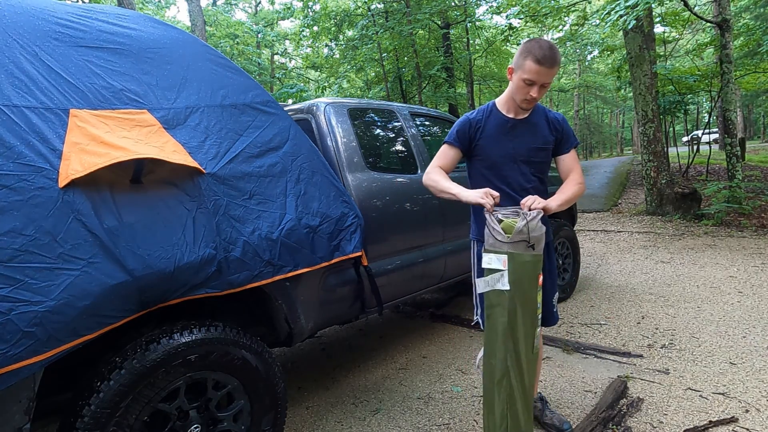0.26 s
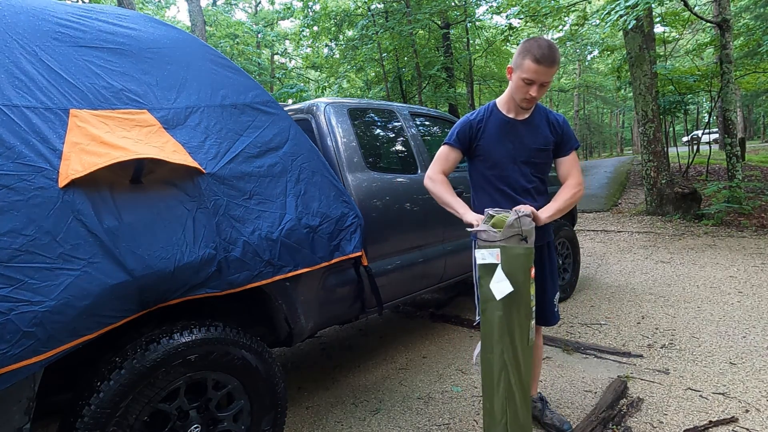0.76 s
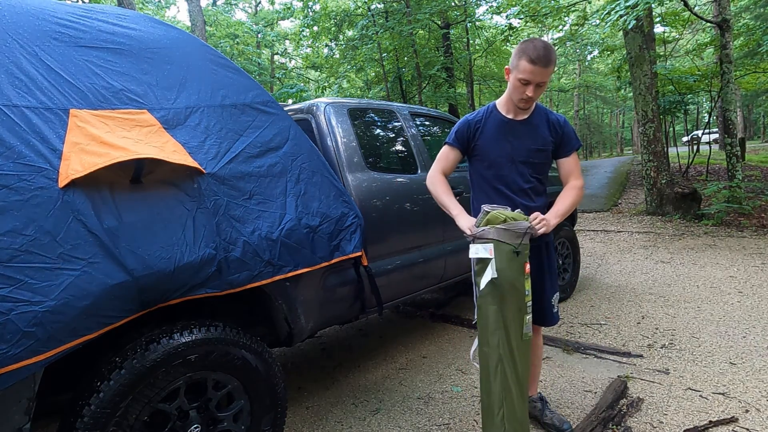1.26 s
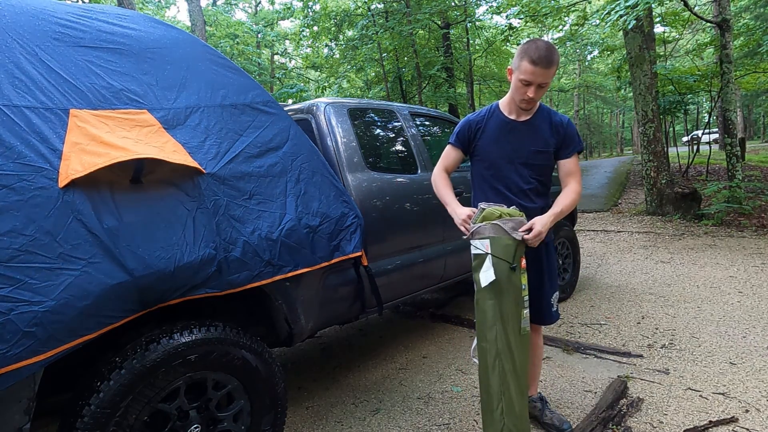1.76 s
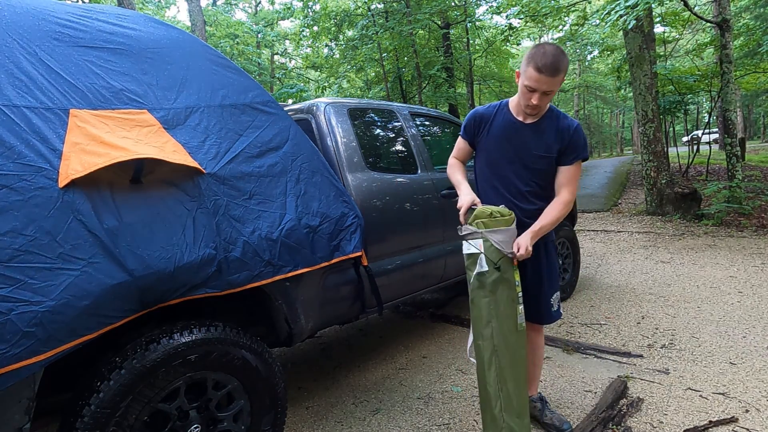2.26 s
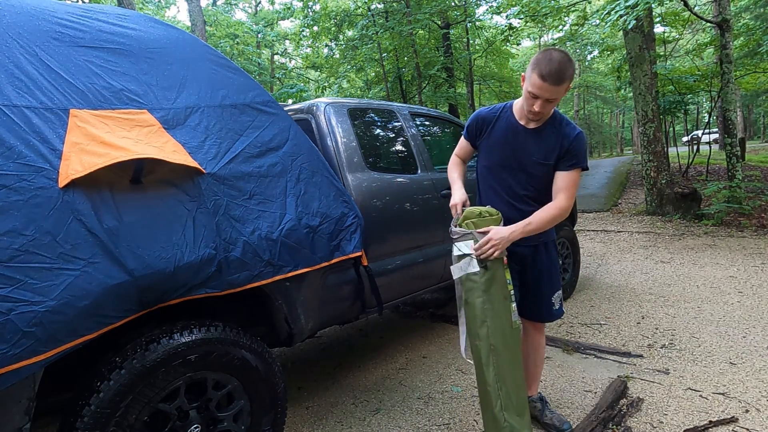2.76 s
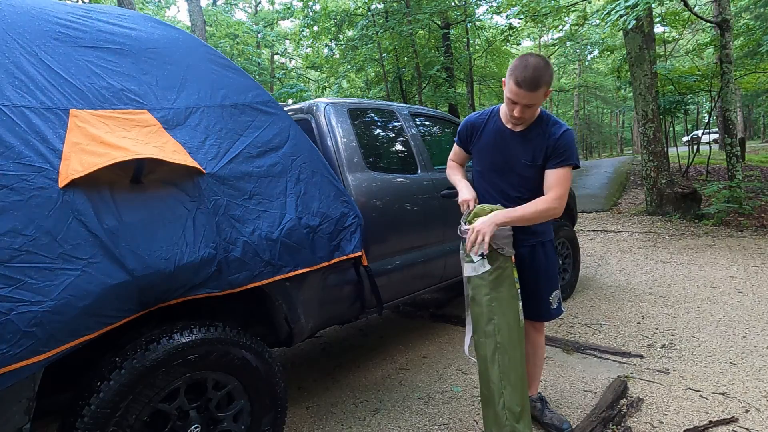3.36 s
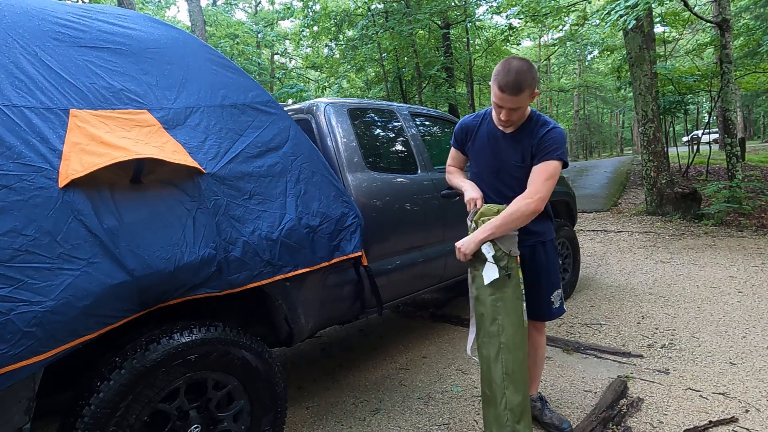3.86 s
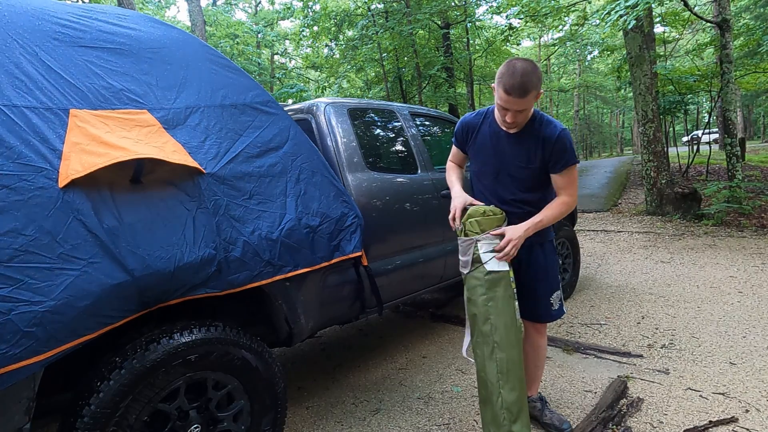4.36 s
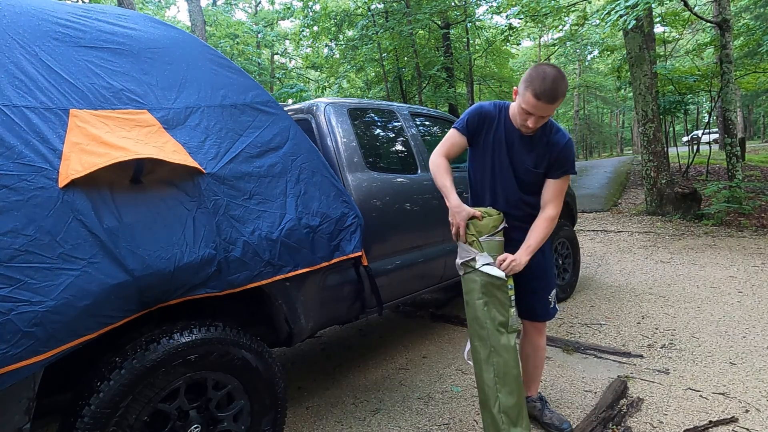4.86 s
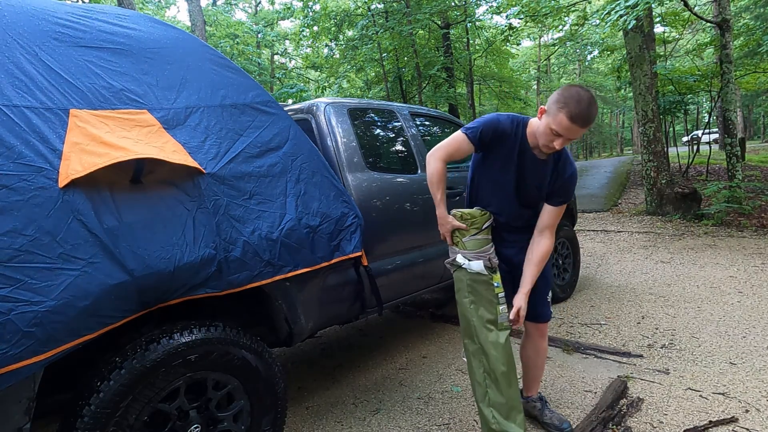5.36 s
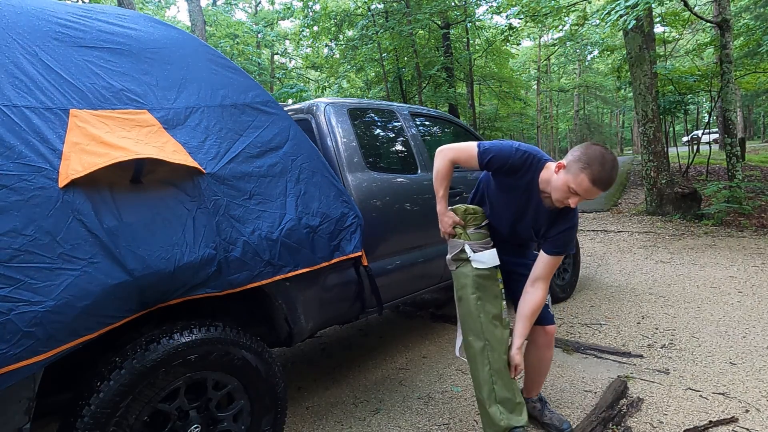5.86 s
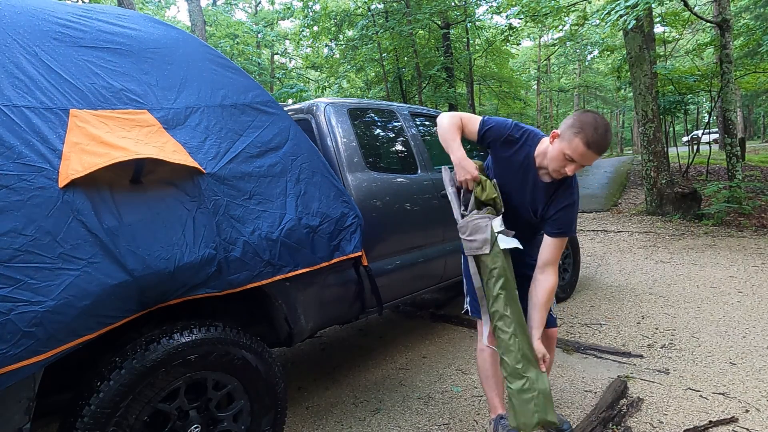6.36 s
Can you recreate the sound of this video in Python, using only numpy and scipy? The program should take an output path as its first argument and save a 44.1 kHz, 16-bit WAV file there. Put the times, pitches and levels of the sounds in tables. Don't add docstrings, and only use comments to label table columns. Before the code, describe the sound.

Outdoors in a wood, quiet leaf hiss, far rumble and a deep, slightly wavering generator hum run throughout. Close by and slightly right, hands work stiff nylon: faint swishes and small crinkles from 0 s, a sharper fold snap with a dull bump at 0.87, a rustle near 1.25, then sparse light crumples. A barely audible high chirp sounds far off around 1.95. Firmer rubbing and popping creases come at 2.4-2.7 and 3.0-3.4, with a short airy flick at 3.0, then a lull until about 4.0. Pulling begins: longer hisses, and a cluster of hollow knocks at 4.75-5.0. A small buckle clinks at 5.2; a metal pole end rings brightly at 5.3 with tiny bounces, half damped by cloth. A crisp snap follows at 5.6, then bumps and crackles from 5.9, building to the loudest, densest rustle and snaps at 6.4-6.6.

```python
import sys
import numpy as np
from scipy import signal
from scipy.fft import rfft, irfft
from scipy.io import wavfile

SR = 44100
rng = np.random.default_rng(int(sys.argv[2]) if len(sys.argv) > 2 else 0)


def log_audio(samples):
    frames = np.atleast_2d(samples).T
    limited = np.clip(frames, -1, 1)
    pcm = np.round(limited * 32767).astype(np.int16)
    wavfile.write(sys.argv[1], SR, pcm)


def field_ratio(decibels):
    return 10 ** (np.asarray(decibels, dtype=float) / 20)


N = 291226


def rms_one(x):
    return x / np.sqrt(np.mean(x ** 2) + 1e-20)


def peak_one(x):
    return x / np.max(np.abs(x))


def in_time(rows):
    s, *columns = np.transpose(rows)
    return [np.interp(np.arange(N) / SR, s, c) for c in columns]


def at_hz(points, hz):
    point_hz, values = np.transpose(points)
    return np.interp(np.log(hz), np.log(point_hz), values)


def coloured(x, spectrum):
    hz = np.arange(N // 2 + 1) * SR / N + 1
    return irfft(rfft(x) * field_ratio(at_hz(spectrum, hz)), N)


def filtered(x, order, hz, kind):
    return signal.sosfilt(signal.butter(order, hz, kind, fs=SR, output="sos"), x)


def drift(rate_hz):
    r = np.exp(-80 * np.pi * rate_hz / SR)
    noise = rng.standard_normal(N // 40 + 2002)
    slow = signal.lfilter([1], [1, -2 * r, r * r], noise)[2000:]
    return np.interp(np.arange(N) / 40, np.arange(len(slow)), rms_one(slow))


def ring(clicks, hz, t60):
    r, w = field_ratio(-60 / (t60 * SR)), 2 * np.pi * hz / SR
    return signal.lfilter([0, np.sin(w)], [1, -2 * r * np.cos(w), r * r], clicks + 1e-18)


def grains(per_s, spread_db, clump_db):
    sizes = field_ratio(spread_db * np.minimum(rng.exponential(1, N), 4)) * rng.standard_normal(N)
    return sizes * (rng.random(N) < per_s * field_ratio(clump_db * drift(25)) / SR)


def ringing_grains(clicks, low_hz, high_hz, cycles):
    pitches = np.geomspace(low_hz, high_hz, num=12)
    dealt = rng.integers(0, 12, size=N)
    return rms_one(sum(ring(clicks * (dealt == k), hz, cycles / hz) for k, hz in enumerate(pitches)))


def add(out, s, sound):
    i = round(s * SR)
    out[i:i + len(sound)] += sound[:N - i]


# time in seconds, pitch in Hz, level in dB.
HUM = [(0.0, 46.7, -40), (0.4, 47.2, -37.5), (0.5, 46, -42), (0.73, 45.9, -37.5), (2.65, 45.9, -39),
       (2.74, 46.5, -37.5), (3.09, 46.8, -40.5), (3.53, 46.6, -36.5), (3.86, 46.4, -40),
       (4.34, 46.77, -37.5), (4.8, 46.53, -39.5), (4.98, 46.6, -37), (6.6, 46.4, -42)]


def generator():
    hz, level_db = in_time(HUM)
    phase = 2 * np.pi * np.cumsum(hz) / SR + np.array([[-.035], [.035]])
    return np.sqrt(2) * field_ratio(level_db + 0.82 * drift(6.9)) * np.sin(phase)


# frequency in Hz, density in dB per Hz.
WOOD_SPECTRUM = [(20, -6.5), (40, -10), (60, 2), (100, -2), (128, -1), (150, -10), (270, -23), (430, -27),
                 (810, -53), (1030, -24.5), (5550, -34.5), (8200, -40), (12700, -55), (14200, -78)]
# frequency in Hz, likeness from 0 to 1.
WOOD_LIKENESS = [(40, 1), (150, 0.88), (400, 0.24), (800, .3), (1200, 0.21), (5000, 0.26), (6100, 0.4),
                 (6600, 0.96), (12500, 0.92), (13500, 0.4)]


def wood():
    mid, side = rng.standard_normal((2, N))
    unlike = [(hz, 10 * np.log10(1 - np.clip(c, 0, .999))) for hz, c in WOOD_LIKENESS]
    mid = coloured(mid, WOOD_SPECTRUM)
    side = coloured(coloured(side, WOOD_SPECTRUM), unlike) / np.sqrt(2)
    level = field_ratio(-51.5 + 0.49 * drift(2.6))
    return level * (mid + side * [[1], [-1]]) / np.std(mid)


# middle in seconds, spread in seconds, level in dB, pitch in Hz, width in Hz,
# left over right in dB.
CHIRP = (1.96, .045, -69, 7800, 500, -4)


def chirp():
    s, spread_s, db, hz, width_hz, pan_db = CHIRP
    breath = filtered(rng.standard_normal((2, N)), 2, [hz - width_hz / 2, hz + width_hz / 2], "band")
    swell = np.exp(-.5 * ((np.arange(N) / SR - s) / spread_s) ** 2)
    return field_ratio(db + pan_db * np.array([[.5], [-.5]])) * swell * rms_one(breath)


# start in seconds, level in dB.
POLE_HITS = [
    (5.301, -31),
    (5.30726, -38.5),
    (5.329, -40),
    (5.342, -57),
]
# pitch in Hz, level in dB, t60 in seconds.
POLE_MODES = [(6711.5, -3.5, 0.76), (6715, -7, 0.23), (6800, -8, 0.45), (6800, -7, 0.15), (6857, -10, 0.13),
              (6050, -23, .03), (7000, -18, .09), (7500, -13, 0.089), (4370, -7, 0.04), (5250, -16, 0.054),
              (3250, -19, .03), (9050, -20, .04), (10100, -20, .04)]
# start in seconds, level in dB, pitch in Hz, t60 in seconds.
CLINK = (5.212, -42, 2643, 0.09)


def metal():
    hits, tap = np.zeros(N), np.zeros(N)
    for s, db in POLE_HITS:
        hits[round(s * SR)] = field_ratio(db)
    s, db, clink_hz, clink_t60 = CLINK
    tap[round(s * SR)] = field_ratio(db)
    grip_s, settle_s, grip_db = 5.347, 0.0073, -4
    held = field_ratio(grip_db * np.clip((np.arange(N) / SR - grip_s) / settle_s, 0, 1))
    pole = sum(field_ratio(d) * ring(hits, hz, t60) for hz, d, t60 in POLE_MODES)
    return held * pole + ring(tap, clink_hz, clink_t60)


# start in seconds, peak in dB.
FLICKS = [(0.8001, -54), (0.8739, -53), (1.0146, -55), (1.6477, -52), (1.8437, -52), (1.9081, -59),
          (2.0732, -54), (2.1525, -58), (2.6424, -51), (2.7422, -46), (2.9088, -50), (2.9782, -50.5),
          (3.025, -34), (3.2036, -48), (3.681, -48), (3.9859, -53), (4.2812, -55), (4.8074, -46),
          (5.1347, -43), (5.3014, -42), (5.5722, -56), (5.6095, -44), (5.8037, -58.5), (5.888, -42)]


def flicks():
    out, t = np.zeros(N), np.arange(800) / SR
    for s, db in FLICKS:
        puff = rng.standard_normal(len(t)) * t * np.exp(-t / 0.0028)
        add(out, s, field_ratio(db - 3.0) * peak_one(filtered(puff, 2, [6000, 14000], "band")))
    return out


# start in seconds, peak in dB, pitch in Hz.
KNOCKS = [(0.831, -52, 312), (0.874, -37, 450), (1.46, -46.5, 236), (1.72, -48, 234), (2.071, -41, 533),
          (2.164, -52, 367), (2.616, -57, 237), (2.648, -53, 420), (3.026, -51, 382), (3.047, -39, 765),
          (3.353, -54.5, 377), (3.988, -47, 703), (4.017, -39, 420), (4.225, -45, 380), (4.756, -27.5, 410),
          (4.744, -38.5, 362), (4.812, -38, 388), (4.845, -37, 428), (4.870, -40, 302), (4.882, -30.5, 465),
          (4.913, -38, 431), (4.926, -35, 400), (4.965, -32.5, 463), (4.99, -39, 450), (5.012, -46, 450),
          (2.503, -37, 400), (4.043, -41, 400), (4.053, -41, 420), (4.103, -43, 380), (1.07, -46, 250),
          (1.11, -47.5, 260), (4.13, -47.5, 200), (4.47, -47, 230), (3.39, -49, 250), (6.58, -36, 517),
          (5.177, -35.5, 429), (5.258, -34, 430.5), (5.307, -40, 407.5), (5.371, -36, 436),
          (5.544, -45.5, 349.5), (5.574, -32.5, 487), (5.609, -30.5, 430), (5.804, -37.5, 441),
          (5.964, -38.5, 413), (6.03, -41, 483), (6.214, -34, 670), (6.384, -31, 444), (6.472, -31, 368)]
# start in seconds, peak in dB, pitch in Hz.
THUMPS = [
    (0.87, -39, 110),
    (1.079, -50, 113),
    (4.119, -50, 110),
    (5.919, -48, 129),
    (5.999, -48, 143),
    (6.108, -45, 120.8),
    (6.166, -44, 206.5),
    (6.229, -38.5, 132),
]


def knocks():
    out, t = np.zeros(N), np.arange(3000) / SR
    for s, db, hz in KNOCKS + THUMPS:
        push = np.sin(2 * np.pi * hz * t) * t * np.exp(-t * hz / 1.24)
        add(out, s, field_ratio(db - 4.0) * peak_one(push))
    return out


# start in seconds, peak in dB, pitch in Hz.
CRINKLES = [(0.652, -48, 3070), (0.7248, -51, 6500), (0.7812, -46, 2900), (0.29, -48, 1200),
            (0.3, -51, 620), (1.225, -41, 1050), (2.168, -45, 650), (3.7, -50, 1800), (0.871, -39, 4480),
            (0.876, -39, 6600), (0.884, -43, 795), (0.914, -45, 2250), (0.928, -46, 3300),
            (0.9513, -46, 3680), (0.9633, -46, 2300), (1.0196, -43, 2650), (1.08, -35.5, 2150),
            (1.097, -43, 2100), (2.401, -31.5, 1450), (2.412, -41, 1200), (2.4, -40, 4710),
            (2.454, -36, 1900), (2.467, -35, 2600), (2.511, -42, 1200), (3.976, -46, 1060),
            (3.988, -40.5, 1603), (4.01, -39, 1043), (4.034, -38, 1100), (4.042, -37, 1400),
            (4.051, -36, 1000), (4.062, -40, 1900), (4.951, -37, 1150), (4.966, -33, 1090),
            (5.589, -32, 3500), (5.59, -38, 1800), (5.599, -37, 3800), (5.612, -31.5, 3120),
            (5.614, -28, 1800), (5.626, -35, 1800), (5.635, -38, 2300), (6.324, -38, 1050),
            (6.378, -32, 711), (6.428, -33, 801), (6.468, -32, 1150), (6.489, -29, 1000),
            (6.507, -29, 1000), (6.518, -34, 1250), (6.533, -32.5, 1150), (6.547, -30.5, 786),
            (6.558, -27, 2120), (6.564, -27, 1400), (6.565, -27, 4000), (6.571, -32, 1350),
            (6.584, -35, 1300), (6.588, -27, 4280),
            (2.823, -47, 1300), (2.947, -45, 2700), (3.027, -40, 1000), (3.037, -38, 1000), (3.055, -39.5, 900),
        (3.17, -46, 1000), (3.245, -40, 2197), (3.29, -42, 1400), (3.366, -41, 2050), (5.849, -42, 600),
        (5.91, -38.5, 900), (5.975, -37.5, 1150), (5.985, -39, 1000), (6.047, -35, 1100),
        (6.052, -36, 1800), (6.062, -35, 1000), (6.085, -39, 1000), (6.148, -40, 1600), (6.19, -33.5, 850),
        (6.233, -37.5, 650)]


def crinkles():
    out, t = np.zeros(N), np.arange(1500) / SR
    rise_s, cycles = 0.00033, 12
    for s, db, hz in CRINKLES:
        shape = (1 - np.exp(-t / rise_s)) * field_ratio(-60 * t * hz / cycles)
        add(out, s, field_ratio(db) * peak_one(shape * np.sin(2 * np.pi * hz * t)))
    return out


# start in seconds, peak in dB, pitch in Hz,
# broad crack in dB over the peak.
FOLD_SNAPS = [(0.029, -49, 1150, -9), (0.376, -45, 1080, -9), (0.552, -39, 1140, -14),
              (0.833, -33.5, 1610, -9), (0.873, -25, 1150, -21), (0.876, -25, 1650, -15),
              (1.137, -37, 1185, -7), (1.255, -30.5, 800, -9), (1.418, -44.5, 902, -9),
              (1.713, -43, 1005, -9), (1.906, -42, 1310, -9), (2.068, -39.5, 900, 4),
              (2.246, -36, 1406, -6), (2.396, -35, 1200, -9), (2.489, -41, 953, -9),
              (2.568, -39.5, 1890, -9), (2.65, -33, 1010, -9), (2.82, -46, 2990, -5),
              (2.904, -44, 1250, -2), (2.991, -38.5, 1058, -9), (3.045, -36, 1040, -9),
              (3.256, -35, 1350, -9), (3.351, -42, 1100, -6), (3.62, -49, 800, -9)]
# start in seconds, peak in dB, pitch in Hz, broad crack in dB over the peak.
PULL_SNAPS = [(4.29, -44, 1190, -12), (4.325, -37.5, 1540, -9), (4.753, -33.5, 2770, 2.5),
              (4.807, -35.5, 1346, -8.5), (4.873, -25, 1062, -9), (5.144, -30.5, 1090, -3),
              (5.178, -34, 1189, -9), (5.265, -37, 1697, -9), (5.286, -37, 1920, -9), (5.3, -28, 1310, -6),
              (5.372, -38, 941, -9), (5.403, -32.5, 1350, -7), (5.545, -39.5, 1200, -15),
              (5.574, -25, 3300, -6), (5.5746, -27.5, 1800, 6), (5.610, -26, 1820, -8),
              (5.804, -31, 1820, -0.5), (5.899, -31, 1873, -3), (5.965, -28.5, 1030, 2),
              (6.013, -33.5, 1727, -4), (6.032, -28, 1030, 2), (6.063, -30, 2700, -5.5),
              (6.169, -33.5, 2000, -9), (6.184, -28.5, 972, -9.5), (6.309, -32.5, 1034, -12),
              (6.385, -30, 718, -9), (6.405, -25, 1150, -10.5), (6.476, -27.5, 1073, -4),
              (6.557, -19, 1190, -3), (6.582, -25, 650, -3)]
# pitch in Hz, level in dB, t60 in seconds.
SACK_MODES = [(267, -37, 0.026), (420, 3.5, 0.05), (696, 6, 0.088)]


def snaps():
    out, t = np.zeros(N), np.arange(2000) / SR
    rows = FOLD_SNAPS + PULL_SNAPS
    burst_ms, crack_s = 9.6, 0.0026
    noises = rng.standard_normal((len(rows), len(t)))
    ticks_hz = 2700 * (5000 / 2700) ** rng.random(len(rows))
    for (s, db, hz, crack_db), tick_hz, noise in zip(rows, ticks_hz, noises):
        burst = noise * np.exp(-t * 2300 / burst_ms)
        burst[:4] -= 2.5
        burst = filtered(burst, 2, 5900, "low")
        fold = peak_one(ring(burst, hz, 13.0 / hz) + 0.28 * ring(burst, hz * 1.52, 8.6 / hz))
        knock = peak_one(sum(field_ratio(d) * ring(burst, f, t60) for f, d, t60 in SACK_MODES))
        tick = peak_one(ring(burst, tick_hz, 20.0 / tick_hz))
        crack = peak_one(filtered(burst * np.exp(-t / crack_s), 2, [600, 3200], "band"))
        add(out, s, field_ratio(db - 1.5) * (fold + field_ratio(-22.0) * knock + field_ratio(-31) * tick))
        add(out, s, field_ratio(db + crack_db) * crack)
    return out


def strokes(rows, rest_db, second_rest_db):
    t = np.arange(0, N + 64, 64) / SR
    power = [[field_ratio(rest_db) ** 2], [field_ratio(second_rest_db) ** 2]]
    for s, db, rise_s, fall_s, second_db in rows:
        away = np.where(t < s, (s - t) / max(rise_s, .005), (t - s) / max(fall_s, .005))
        power = power + field_ratio(db - 10 * away ** 1.16 + np.array([[0], [second_db]])) ** 2
    return [np.interp(np.arange(N) / SR, t, np.sqrt(p)) for p in power]


# peak in seconds, peak in dB,
# rise in seconds per 10 dB, fall in seconds per 10 dB, sheen in dB over swish.
FOLD_SLIDES = [(0.0, -52, 0.168, 0.05, -14.1), (0.382, -60.5, 0.24, -0.1, -9),
               (0.48, -62.5, 0.02, 0.203, -13), (0.875, -55, 0.11, 0.12, -7.5),
               (1.025, -51.5, 0.03, 0.04, -12), (1.09, -54, 0.08, 0.15, -9.5),
               (1.275, -48.5, 0.14, 0.04, -9.3), (1.493, -60.5, 0.3, 0, -11.3),
               (1.653, -54.0, 0.04, 0.03, -12), (1.718, -54.3, 0.03, 0.082, -11.3),
               (1.849, -57, -0.03, 0.062, -6.7), (1.977, -57.5, 0.05, -0.06, -11.9),
               (2.087, -53, 0.07, 0.093, -14.5), (2.428, -45.5, 0.116, 0.084, -9.5),
               (2.51, -50, 0.05, 0.02, -4), (2.665, -50.5, 0.09, 0.082, -9),
               (2.826, -57, 0.015, 0.01, -21.5), (2.915, -56.5, -0.05, 0.03, -5),
               (3.042, -50.5, 0.1, 0.08, -6.5), (3.284, -47, 0.16, 0.032, -11.6),
               (3.366, -52.5, 0.1, 0.053, -9.9), (3.685, -57, 0.15, 0.1, -7),
               (4.031, -49, 0.075, 0.09, -10.5)]
# peak in seconds, peak in dB,
# rise in seconds per 10 dB, fall in seconds per 10 dB, sheen in dB over swish.
PULL_SLIDES = [(4.338, -49, 0.16, -0.03, -8.5), (4.502, -53, 0.215, 0.021, -5),
               (4.597, -46.5, 0.12, 0.055, -9.5), (4.691, -51.5, 0.054, 0.06, -16.7),
               (4.752, -56, 0.04, 0.2, -12.5), (4.93, -42.0, 0.17, 0.09, -10.5),
               (5.148, -46.5, 0.03, 0.1, -8.5), (5.304, -48.5, -0.0147, 0.0546, 3.5),
               (5.39, -52.5, -0.07, 0.22, -13), (5.59, -48.5, 0.03, 0.16, -10.5),
               (5.9, -48.5, 0.22, 0.12, -9.5), (6.178, -49.5, 0.06, -0.1, -6),
               (6.407, -49.5, 0.129, 0.697, -7.2), (6.6, -39.5, 0.38, 0.439, -12)]
# peak in seconds, peak in dB,
# rise in seconds per 10 dB, fall in seconds per 10 dB, hollow in dB over crumple.
FOLD_GRIPS = [(0.0, -50, 0.072, 0.06, -1.5), (0.387, -55.0, 0.07, 0.027, -3),
              (0.563, -57.5, -0.02, 0.06, -4), (0.883, -47.0, 0.05, 0.03, 2.5),
              (1.086, -50.5, 0.09, 0.25, -0.5), (1.284, -46.1, 0.13, 0.01, 3),
              (1.473, -66, 0.041, 0.16, 10.0), (1.728, -52, 0.03, 0.1, -3), (1.915, -57.5, 0.03, 0.16, 2.4),
              (2.068, -52.5, -0.02, 0.026, 3), (2.162, -53.5, -0.02, 0.03, 4.5),
              (2.455, -46, 0.18, 0.12, -1.5), (2.653, -49.5, 0.04, 0.065, -0.6),
              (2.82, -54, -0.07, -0.04, -18.0), (3.047, -50, 0.06, 0.06, 0),
              (3.243, -46.5, 0.04, 0.062, -4), (3.358, -47, 0, 0.029, -2.3), (3.519, -64, -0.1, 0.013, 2.9),
              (3.67, -52, 0, 0, -15.9), (3.784, -62.3, -0.04, -0.05, 2.6), (4.044, -43, 0.07, 0.08, 1)]
# peak in seconds, peak in dB,
# rise in seconds per 10 dB, fall in seconds per 10 dB, hollow in dB over crumple.
PULL_GRIPS = [(4.226, -52.5, 0.04, 0.14, 4), (4.549, -51.5, 0.32, -0.3, -2),
              (4.768, -54.0, 0.04, -0.2, 10.0), (4.891, -44, 0.045, 0.14, 6.1),
              (5.183, -49, 0.15, 0.029, -4), (5.316, -48, 0.12, 0.05, -1), (5.39, -49, 0.025, 0.1, -2),
              (5.614, -43, 0.06, 0.08, -0.3), (5.909, -45, 0.216, 0.02, -1.5),
              (5.974, -46, -0.02, 0.1, 2.4), (6.05, -41.5, 0.06, 0.033, -4), (6.187, -44, 0.084, 0.2, 0),
              (6.405, -43.5, 0.13, 0.1, -5), (6.573, -37, 0.2, 2, -4.1)]
# frequency in Hz, density in dB per Hz.
SWISH = [(1800, -4.5), (2800, -3.5), (4800, -2.5), (6200, -7.5), (7500, -10), (9000, -30.5)]
# frequency in Hz, density in dB per Hz.
SHEEN = [(5500, -6), (7500, -5.5), (9000, -5), (12500, -7.5), (13800, -24), (15200, -50)]


def cloth():
    swish_gain, sheen_gain = strokes(FOLD_SLIDES + PULL_SLIDES, -66.5, -78.5)
    crumple_gain, hollow_gain = strokes(FOLD_GRIPS + PULL_GRIPS, -75.5, -78)
    weave = rng.standard_normal(N) * field_ratio(2.03 * drift(31))
    weave = weave + 0.73 * rms_one(grains(2500, 2.1, 3.8))
    swish = rms_one(coloured(weave, SWISH))
    sheen = rms_one(coloured(weave, SHEEN))
    crumple = ringing_grains(grains(5000, 2.2, 3.0), 937, 2450, cycles=12.3)
    crumple = filtered(crumple, 2, 740, "high")
    shakes = grains(2500, 3.0, 3.0)
    hollow = ringing_grains(shakes, 285, 690, cycles=3.8) + .5 * rms_one(ring(shakes, 432, 0.04))
    hollow = filtered(hollow, 2, 230, "high")
    slide = field_ratio(-1.3) * swish_gain * swish + field_ratio(-0.57) * sheen_gain * sheen
    return slide + field_ratio(-1.86) * crumple_gain * crumple + field_ratio(-6.5) * hollow_gain * hollow


def outdoors(x):
    t = np.arange(6000) / SR
    scatter_db, scatter_t60_s = -15.5, 0.17
    pan_share, port_lag = 0.11, 0.73
    scatter = rng.standard_normal((2, len(t))) * field_ratio(-60 * t / scatter_t60_s) * (t > .002)
    scatter *= field_ratio(scatter_db) / np.linalg.norm(scatter[0])
    echo_mid, echo_side = signal.fftconvolve(x[None], scatter, axes=1)[:, :N]
    side = echo_side - pan_share * x - port_lag * np.gradient(x)
    below = signal.sosfiltfilt(signal.butter(6, 5300, fs=SR, output="sos"), side)
    side = 0.17 * side + 0.81 * below
    side += field_ratio(-5) * filtered(echo_side / field_ratio(scatter_db) - x, 2, [13200, 14400], "band")
    return x + echo_mid + side * [[1], [-1]]


def scene():
    handling = cloth() + snaps() + knocks() + flicks() + crinkles() + metal()
    return outdoors(handling) + wood() + generator() + chirp()


def roll_off(x):
    return signal.sosfilt(signal.butter(12, 15050, fs=SR, output="sos"), x)


def record(dry):
    top_cut = signal.cheby2(10, 50, 15700, fs=SR, output="sos")
    mix = signal.sosfilt(top_cut, dry)
    return roll_off(mix)


dry = scene()
out = record(dry)
log_audio(out)
```